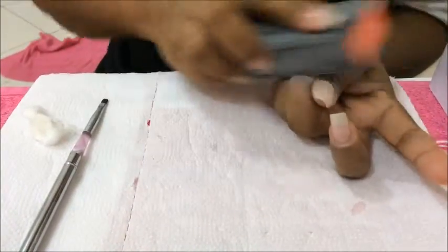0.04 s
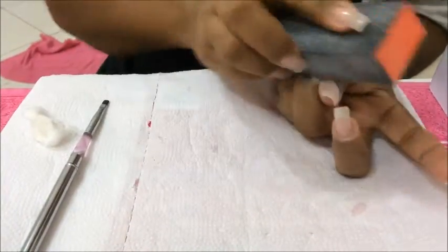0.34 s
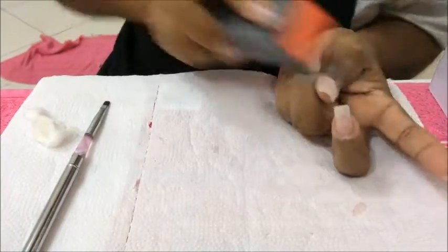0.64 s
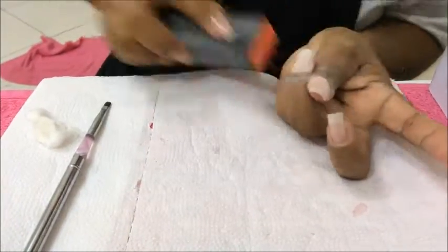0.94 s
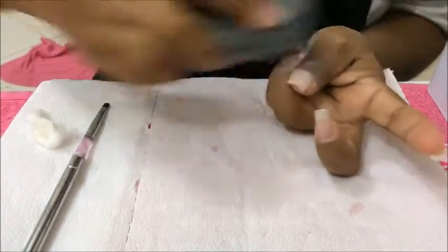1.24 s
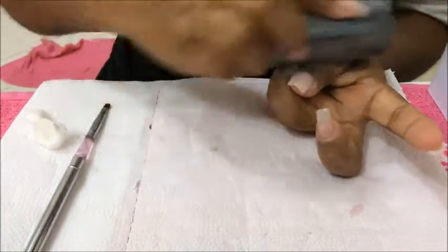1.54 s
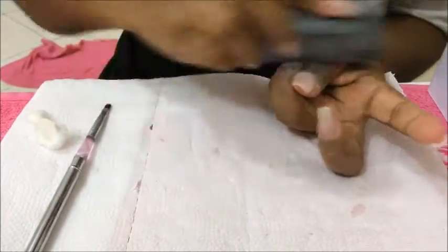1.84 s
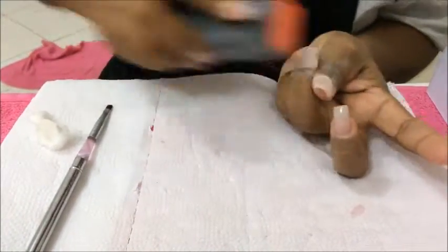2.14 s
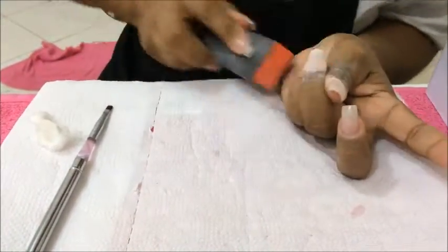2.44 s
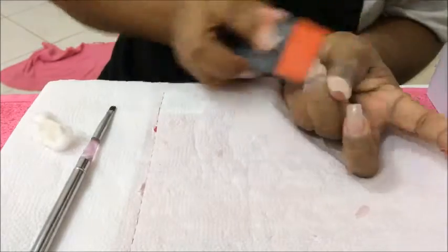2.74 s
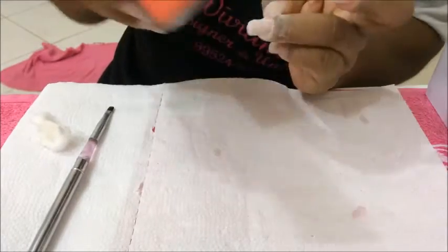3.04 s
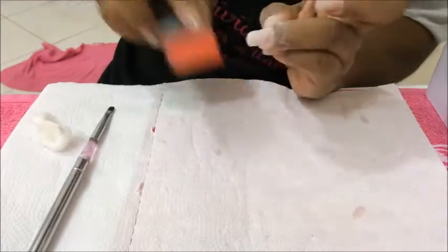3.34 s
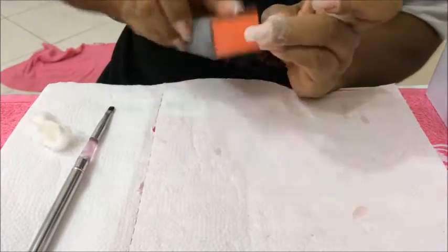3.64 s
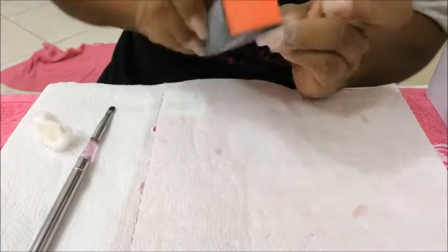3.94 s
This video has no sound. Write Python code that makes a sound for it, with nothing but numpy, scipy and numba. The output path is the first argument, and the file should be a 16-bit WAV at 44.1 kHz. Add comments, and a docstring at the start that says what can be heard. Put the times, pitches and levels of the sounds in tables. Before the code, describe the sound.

Dry, scratchy nail buffing in brisk paired strokes, then a pause and three single swipes.

```python
"""An abrasive buffer block rasps over a fingernail in eight pairs of strokes: a push that lands and fades,
then a pull that holds and slips off the edge. Dense grit makes the nail ring, and the ring glides as the
contact moves; clicks and soft thuds join in. Two faint, brief wavering tones near 2 kHz come early; later,
the block squeaks once on the nail. After a pause with light brushes come three single swipes.
All along, a small room echoes and rumbles, heard by a close, mono microphone."""
import sys
import numpy as np
from scipy import signal
from scipy.fft import rfft, irfft
from scipy.io import wavfile
from numba import njit

SR = 44100
rng = np.random.default_rng(int(sys.argv[2]) if len(sys.argv) > 2 else 0)


def master_out(mix):
    """Clip the mix to full scale and print it as 16-bit PCM to the path in sys.argv[1]."""
    frames = np.transpose(np.atleast_2d(mix))
    ceiling = np.clip(frames, -1, 1)
    pcm = np.round(ceiling * 32767).astype(np.int16)
    wavfile.write(sys.argv[1], SR, pcm)


N = 176400

# The bright tone of grit on the nail: pitch_hz, level_db
GRIT_TONE = [(300, -32), (1200, -40.5), (1900, -4.5), (2600, -6), (3300, 1), (5500, 0.5), (8500, 1.5),
             (12500, 1), (15000, -1)]
# The dull tone of the foam block: pitch_hz, level_db
BLOCK_TONE = [(60, -1), (160, -2), (380, -3.5), (520, -3.5), (750, -1.5), (1150, 0), (1700, 2.5),
              (2400, -2), (4000, -36), (12000, -51)]


def buffing():
    """The block goes to and fro. Returns the sound at the microphone and the sound sent into the room."""
    # One push a row: start_s, length_s, attack_s, level_db, fade_db, block_db, ring_from_hz,
    # ring_to_hz, ring_db, hiss_peak_hz, hiss_peak_db, hiss_dip_hz
    pushes = [ (-.02, 0.13, .006, -24, -23.5, -2, 6400, 6000, -9, 12900, 2.5, 9300),
              (0.355, 0.11, 0.0099, -25.5, -12, -11, 4800, 4900, -4.5, 10100, 4.5, 6900),
              (0.754, 0.093, .007, -23.5, -11, -4.5, 4070, 3360, -6, 6700, -1.5, 12900),
              (1.142, 0.12, 0.023, -22, -24, -9.5, 4660, 2740, -5.5, 7700, 4.5, 4800),
              (1.517, 0.091, 0.02, -24.5, -7.5, -5.5, 4900, 2880, -8, 8300, 3.5, 6400),
              (1.895, 0.11, 0.014, -26.5, -11.5, -2, 4170, 2740, -4.5, 8200, 4, 14040),
              (2.263, 0.094, 0.013, -25, -11, -2, 3930, 3200, -27, 9300, 1, 7140),
              (2.662, 0.071, 0.012, -26, -4, -3.5, 3700, 3380, -1, 5940, 1.5, 10700)]
    # The pulls, then the three single swipes: same columns
    pulls = [ (.101, 0.1, 0.018, -26, -4, 0.5, 4700, 4750, -5, 13100, 2.2, 4000),
             (.494, .098, 0.013, -23.5, -7, -3, 5000, 3700, -6.5, 5800, 0.73, 6860),
             (.882, 0.093, 0.01, -23, -7, -4, 3670, 3550, -8.5, 5700, 0.7, 2680),
             (1.266, 0.097, 0.04, -20.5, -16.5, 5.5, 3550, 3560, 0, 9400, 1, 7240),
             (1.630, 0.097, 0.033, -21, -12, -0.5, 3250, 3200, -6.5, 9900, 3, 4600),
             (1.995, 0.11, 0.036, -28.5, -4.5, 2.5, 3130, 3370, -8.5, 13600, 2.2, 7150),
             (2.403, 0.093, 0.0067, -26.5, -4.5, -2.5, 4560, 4300, -30, 6500, 3.3, 8050),
             (2.770, 0.099, 0.015, -25, -4.5, -3.5, 3580, 4440, -13.5, 5400, 0.78, 10300),
             (3.248, .080, 0.02, -27, 2.5, -0.5, 4040, 3720, 8.5, 8600, 3.7, 13700),
             (3.611, .126, 0.02, -26.5, -3.5, 2.5, 4660, 2680, 1, 8700, 0.85, 7200),
             (3.963, 0.053, 0.0088, -27, -6, 2, 4050, 3860, -4.5, 12500, 2, 6900)]
    near, sent = np.zeros(N), np.zeros(N)
    for rows, is_pull in (pushes, False), (pulls, True):
        for start_s, *settings in rows:
            to_microphone, to_room = stroke(is_pull, *settings)
            add(near, start_s, to_microphone)
            add(sent, start_s, to_room)
    return near, sent


def stroke(is_pull, length_s, attack_s, level_db, fade_db, block_db, ring_from_hz, ring_to_hz, ring_db,
           hiss_peak_hz, hiss_peak_db, hiss_dip_hz, size=8192):
    """One pass of the block: the grit hisses, the nail rings and the foam adds a dull rub."""
    t = np.arange(size) / SR
    progress = np.minimum(t / length_s, 1)
    if is_pull:
        edge_bite_db = 2 * np.exp(np.minimum(t - length_s, 0) / 0.005)  # harder at the nail's edge
        force_db = fade_db * progress + edge_bite_db
        mids_db = bell(t, 0.031, 0.021) - .5  # a lift just after the block grips
        attack_curve, release_s, brighten_db = 1.7, .002, 14.5
    else:
        crest_s = .028  # a push gathers speed until here, then slows
        slowing = np.clip((t - crest_s) / (length_s - crest_s), 0, 1)
        force_db = -5 * np.maximum(1 - t / crest_s, 0) + fade_db * slowing ** 1.47
        mids_db = 1.5 * np.exp(-t / .004)  # a lift as the block lands
        attack_curve, release_s, brighten_db = 0.79, 0.0049, -12.5
    hiss = grit_hiss(hiss_peak_hz, hiss_peak_db, hiss_dip_hz, size)
    mids = low_pass(hiss, 5300, steepness=6)
    tilt = gain(brighten_db * (progress - .5) / 2)  # pulls grow brighter, pushes duller
    rasp = gain(force_db) * ((hiss - mids) * tilt + gain(mids_db) * mids / tilt)
    ring = nail_ring(ring_from_hz + (ring_to_hz - ring_from_hz) * progress)
    swell_db = 1.5 * np.sin(np.pi * progress)  # the ring gets a lift in mid-stroke
    nail = gain(force_db + ring_db + swell_db - 7) * ring
    block = gain(block_db + 0.85 * force_db - 17) * scrape(BLOCK_TONE, size)
    rise = np.minimum(t / attack_s, 1) ** attack_curve
    release = np.exp(-np.maximum(t - length_s, 0) / release_s)
    chatter = gain(2.52 * wander(240, size))
    loudness = gain(level_db) * rise * release * chatter
    to_microphone = table_echoes(hand_echoes(loudness * (rasp + nail + block)))
    to_room = loudness * (rasp + gain(-10) * nail + block)  # the ring points mostly at the microphone
    return to_microphone, to_room


def grit(size, grains_per_s=30000):
    """Abrasive grains make dense, tiny collisions of uneven strength."""
    hits = rng.random(size) < grains_per_s / SR
    return normalise(hits * rng.choice([-1, 1], size) * gain(rng.uniform(-0.063, 1.5, size)))


def scrape(tone, size):
    """Grain collisions take on the tone of the nail or the block."""
    return normalise(colour(grit(size), tone))


def grit_hiss(peak_hz, peak_db, dip_hz, size):
    """Grit hisses on the nail, with one broad peak and one narrow dip in its tone."""
    peak_and_dip = lambda hz: gain(peak_db * bell(hz, peak_hz, 810) - 8.5 * bell(hz, dip_hz, 160))
    return normalise(shape(scrape(GRIT_TONE, size), peak_and_dip))


def nail_ring(pitch_hz):
    """Grit makes the nail ring at a gliding pitch; a second filter narrows the ring."""
    broad_ring = resonate(grit(len(pitch_hz)), pitch_hz, width_hz=1010.0)
    return normalise(resonate(broad_ring, pitch_hz, width_hz=949.4))


def knocks_and_thuds(size=8192, click_decay_s=0.0016, knock_decay_s=0.0068, thud_decay_s=0.011):
    """The nail clicks as the block knocks it or snaps off its edge, and the finger thuds softly."""
    # Hits of the block on the nail: start_s, click_db, knock_db
    knocks = [(.357, -31, -46), (0.757, -28, -49), (.366, -36, -32.5), (1.1433, -34, -31),
              (1.519, -51, -39.5), (2.266, -38, -41), (2.4887, -21.5, -38), (3.594, -33, -39),
              (3.7351, -13.5, -35), (3.943, -42, -43)]
    # Thuds of the finger as the block grips or leaves it: start_s, pitch_hz, level_db
    thuds = [(0.105, 127, -32.5), (.200, 146.5, -27.5), (0.39, 133, -30.5), (0.593, 150, -31.5),
             (0.975, 148, -34.5), (1.334, 135, -45), (2.11, 137, -39.5), (2.492, 153, -41),
             (2.866, 143, -41), (3.738, 136, -61)]
    out, t = np.zeros(N), np.arange(size) / SR
    for start_s, click_db, knock_db in knocks:
        click = gain(click_db) * scrape(GRIT_TONE, size) * np.exp(-t / click_decay_s)
        knock = gain(knock_db) * scrape(BLOCK_TONE, size) * np.exp(-t / knock_decay_s)
        add(out, start_s, click + knock)
    for start_s, pitch_hz, level_db in thuds:
        add(out, start_s, gain(level_db) * np.sin(2 * np.pi * pitch_hz * t) * np.exp(-t / thud_decay_s))
    return out


def tones_and_squeak(waver=0.016, size=4096):
    """Two faint, brief wavering tones near 2 kHz; later, one short squeak of the block on the nail."""
    # The two tones, then the squeak: start_s, length_s, from_hz, to_hz, level_db
    tones = [(.385, 0.033, 2180, 2140, -39), (0.41, .045, 1936, 1820, -42.5), (1.324, 0.043, 933, 980, -43)]
    # Strength of each tone at 1, 2, 3 and 4 times its pitch: level_db
    harmonics_db = [4, 4, -17, -13]
    out, t = np.zeros(N), np.arange(size) / SR
    for start_s, length_s, from_hz, to_hz, level_db in tones:
        progress = np.minimum(t / length_s, 1)
        pitch_hz = (from_hz + (to_hz - from_hz) * progress) * (1 + waver * wander(280, size))
        phase = 2 * np.pi * np.cumsum(pitch_hz) / SR
        tone = sum(gain(db) * np.sin(k * phase) for k, db in enumerate(harmonics_db, 1))
        add(out, start_s, gain(level_db) * tone * np.sin(np.pi * progress))
    return out


def light_brushes(attack_s=0.00053, release_s=0.00044, boost_db=5.5, size=4096):
    """The block barely touches the nail: very short scrapes with a little ring."""
    # One brush a row: start_s, length_s, level_db (before the boost)
    brushes = [(2.992, 0.035, -59.5), (3.034, 0.015, -58), (3.159, 0.0019, -64), (3.172, .003, -62),
               (3.214, 0.0096, -45), (3.946, 0.018, -54)]
    out, t = np.zeros(N), np.arange(size) / SR
    for start_s, length_s, level_db in brushes:
        ring = normalise(resonate(grit(size), np.full(size, 3600.), width_hz=1400.0))
        brush = scrape(GRIT_TONE, size) + gain(1.5) * ring
        contact = np.minimum(t / attack_s, 1) * np.exp(-np.maximum(t - length_s, 0) / release_s)
        add(out, start_s, gain(level_db + boost_db) * brush * contact)
    return out


def hand_echoes(sound, places=6, move_s=0.034, decay_s=0.0011, echo_db=-7, size=256):
    """Echoes between block and fingers colour the rasp, and shift as the block travels."""
    t = np.arange(size) / SR
    place = np.minimum(np.arange(len(sound)) / SR / move_s, places - 1)
    out = sound
    for k in range(places):
        echo = rng.standard_normal(size) * np.exp(-t / decay_s) * np.minimum(t / 0.00031, 1)
        nearness = np.sqrt(np.maximum(1 - abs(place - k), 0))  # blends each place into the next
        out = out + gain(echo_db) * nearness * apply_echo(sound, echo)[:len(sound)]
    return out / np.sqrt(1 + gain(echo_db) ** 2)


def table_echoes(sound, decay_s=0.023, echo_db=-15.5, size=4096):
    """Quick echoes come off the table and the body, different for each stroke."""
    t = np.arange(size) / SR
    echo = rng.standard_normal(size) * np.exp(-t / decay_s) * (t > .001)
    return sound + gain(echo_db) * apply_echo(sound, echo)[:len(sound)]


def room_echo(sound, low_fade_s=0.59, treble_fade_s=0.21, size=32768):
    """The small room answers with a smooth tail whose treble dies sooner."""
    # The tone of the room's answer: pitch_hz, level_db
    room_tone = [(100, 2), (500, 8), (1500, 5.5), (2500, 9.5), (4000, 4), (8000, 4), (12000, 4), (15000, 2)]
    t = np.arange(size) / SR
    noise = rng.standard_normal(size)
    lows = low_pass(noise, 5000, steepness=2)
    tail = lows * gain(-60 * t / low_fade_s) + (noise - lows) * gain(-60 * t / treble_fade_s)
    tail *= np.minimum(t / 0.0023, 1)
    return colour(gain(-16.5) * apply_echo(sound, tail), room_tone)[:N]


def background(air_db=-59):
    """A low rumble, drones that swell and ebb, and a faint airy hiss."""
    # The tone of the rumble: pitch_hz, level_db
    rumble_tone = [(25, -58), (45, -8), (60, 0.5), (90, -0.5), (125, 2.5), (165, -1.5), (210, -4.5),
                   (260, -13.5), (330, -7), (420, -12), (520, -22), (700, -14)]
    # How loud the rumble is over time: time_s, level_db
    rumble_levels = [(0, -48.5), (.4, -47), (1.1, -48.5), (1.9, -51.5), (2.4, -50.5), (3.1, -51.5),
                     (4, -51.5)]
    # Low drones: pitch_hz, width_hz, loudest_s, spread_s, level_db
    drones = [(67.2, 17, .42, 0.092, -45), (68, 13.1, 1.1, 0.12, -41.5), (71.8, 14, 1.54, 0.24, -45),
              (70.8, 5.4, 3.5, .2, -45), (144, 10, 0.93, 4, -56.5), (312, 31, 2.52, 0.27, -54.5),
              (386, 9.2, 0.012, 0.066, -45)]
    # The tone of the air: pitch_hz, level_db
    air_tone = [(300, 8), (700, -5), (1500, 0), (3000, -12), (8000, -13), (15000, -20)]
    t = np.arange(N) / SR
    rumble = normalise(low_pass(colour(rng.standard_normal(N), rumble_tone), 750, steepness=4))
    rumble *= gain(np.interp(t, *np.array(rumble_levels).T))
    hum = np.zeros(N)
    for pitch_hz, width_hz, loudest_s, spread_s, level_db in drones:
        swell = gain(level_db + 2 * wander(width_hz / 2, N)) * bell(t, loudest_s, spread_s)
        wavering_hz = pitch_hz + width_hz / 4 * wander(width_hz, N)
        hum += swell * np.sin(2 * np.pi * np.cumsum(wavering_hz) / SR)
    air = gain(air_db) * normalise(colour(rng.standard_normal(N), air_tone))
    return rumble + hum + air


def gain(db):
    """Turn decibels into a number to multiply by."""
    return 10 ** (np.asarray(db) / 20)


def normalise(sound):
    """Scale a sound to an average power of 1."""
    return sound / np.sqrt(np.mean(sound ** 2) + 1e-18)


def bell(x, centre, width):
    """A smooth bump that reaches 1 at its centre."""
    return np.exp(-.5 * ((x - centre) / width) ** 2)


def wander(turns_per_s, size):
    """A random drift around zero."""
    return 0.4 * np.interp(np.arange(size) * turns_per_s / SR, np.arange(4000), rng.standard_normal(4000))


def shape(sound, gain_at):
    """Multiply each frequency in a sound by gain_at(hz)."""
    hz = np.arange(len(sound) // 2 + 1) * SR / len(sound) + 1e-3
    return irfft(rfft(sound) * gain_at(hz), len(sound))


def low_pass(sound, cutoff_hz, steepness):
    """Keep the lows and soften what lies above the cutoff."""
    return shape(sound, lambda hz: 1 / (1 + (hz / cutoff_hz) ** steepness))


def colour(sound, tone):
    """Filter a sound by a table of pitch_hz, level_db."""
    pitch_hz, level_db = np.array(tone).T
    return shape(sound, lambda hz: gain(np.interp(np.log(hz), np.log(pitch_hz), level_db)))


@njit
def resonate(sound, pitch_hz, width_hz):
    """Keep only a band of frequencies around a pitch that may move."""
    out, band_state, low_state = np.empty(len(sound)), 0., 0.
    for i in range(len(sound)):
        tuning, damping = np.tan(np.pi * pitch_hz[i] / SR), width_hz / pitch_hz[i]
        band = (band_state + tuning * (sound[i] - low_state)) / (1 + tuning * (tuning + damping))
        band_state = 2 * band - band_state
        low_state += 2 * tuning * band
        out[i] = damping * band
    return out


def apply_echo(sound, echo):
    """Pass a sound through an echo pattern, keeping about the same energy."""
    return signal.fftconvolve(sound, normalise(echo) / np.sqrt(len(echo)))


def add(out, start_s, sound):
    """Mix a sound in at its start time."""
    offset = int(round(start_s * SR))
    first, last = max(offset, 0), min(offset + len(sound), N)
    if last > first:
        out[first:last] += sound[first - offset:last - offset]


def scene():
    """The buffing in its room, the same in both channels."""
    near, sent = buffing()
    small_sounds = light_brushes() + knocks_and_thuds()
    mono = near + small_sounds + tones_and_squeak() + room_echo(sent + small_sounds) + background()
    return np.array([mono, mono])


def record(dry, top_hz=15480):
    """The recorder steeply cuts the highest treble."""
    return signal.sosfilt(signal.ellip(10, .2, 75, top_hz, fs=SR, output="sos"), dry)


dry = scene()
out = record(dry)
master_out(out)
```